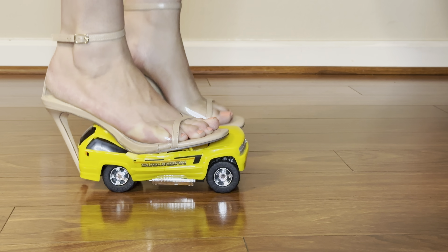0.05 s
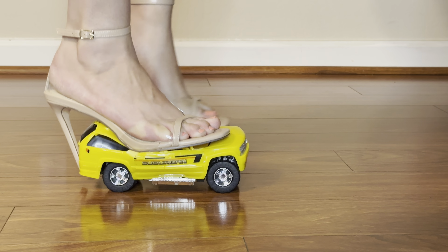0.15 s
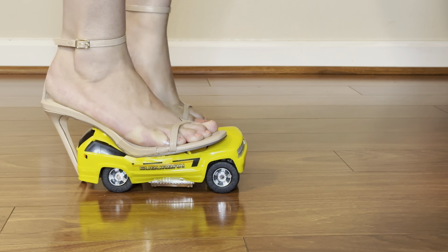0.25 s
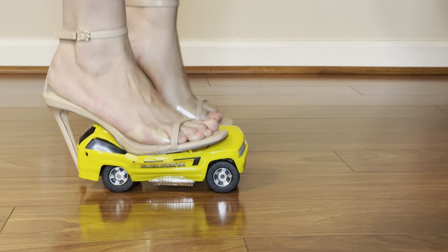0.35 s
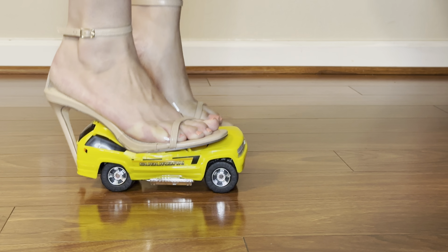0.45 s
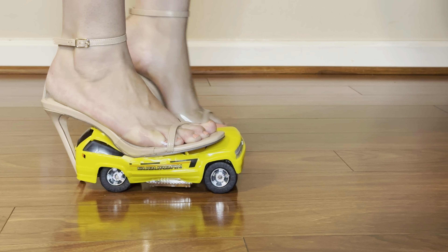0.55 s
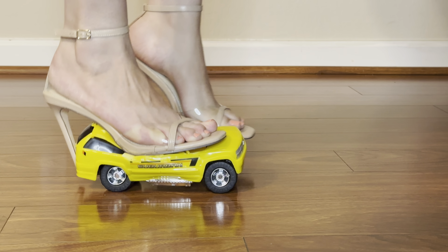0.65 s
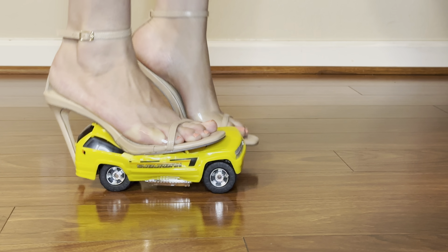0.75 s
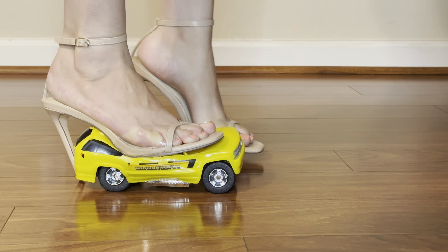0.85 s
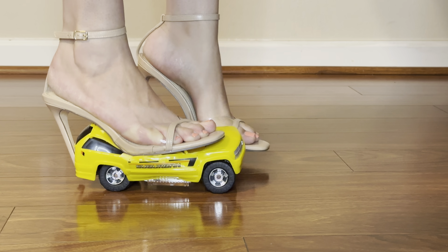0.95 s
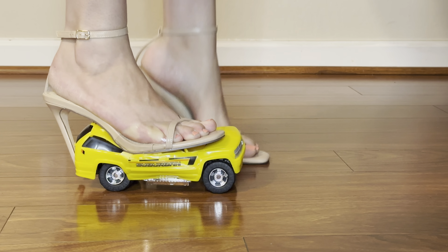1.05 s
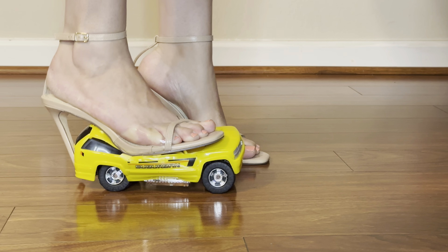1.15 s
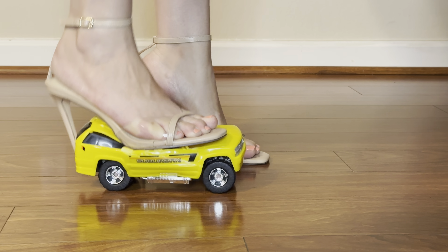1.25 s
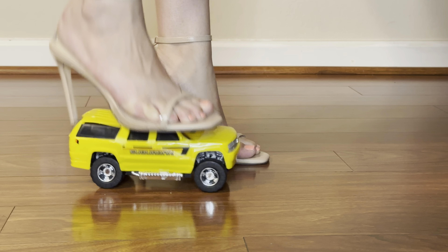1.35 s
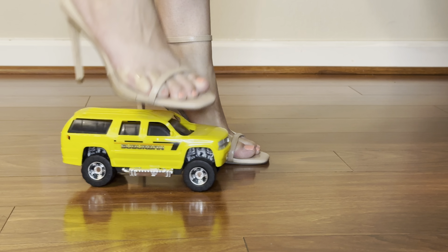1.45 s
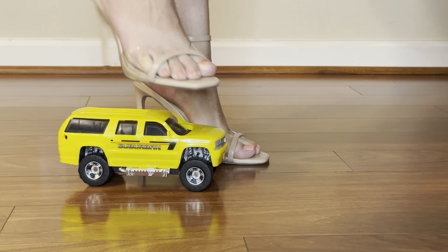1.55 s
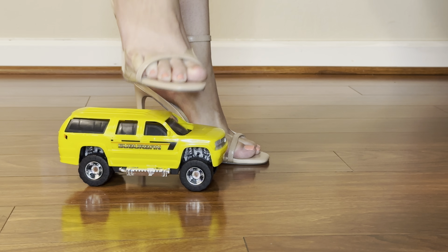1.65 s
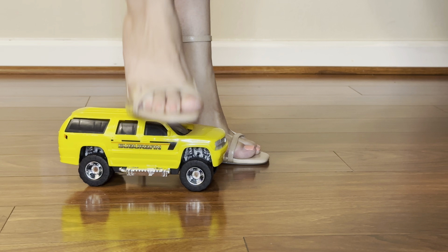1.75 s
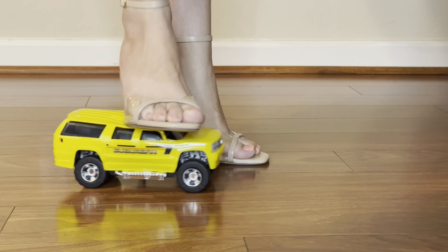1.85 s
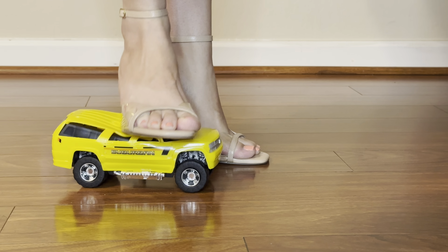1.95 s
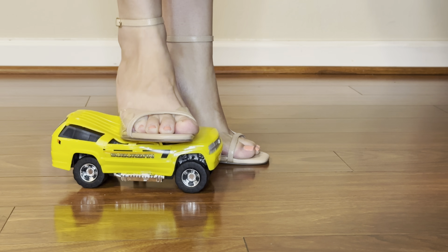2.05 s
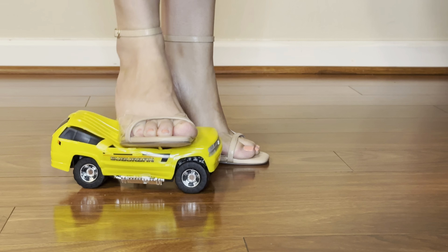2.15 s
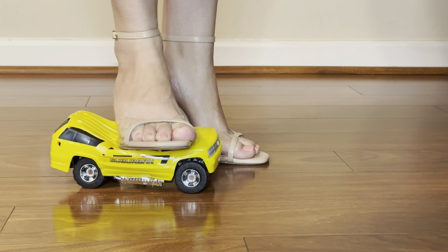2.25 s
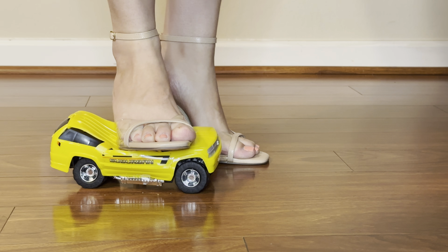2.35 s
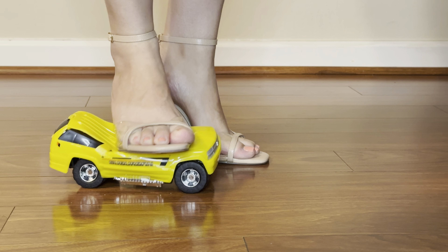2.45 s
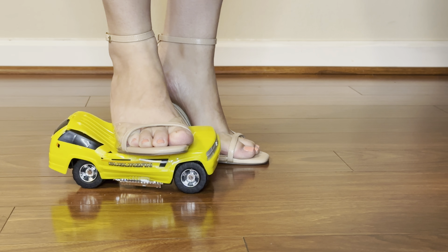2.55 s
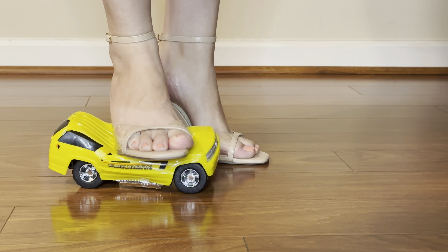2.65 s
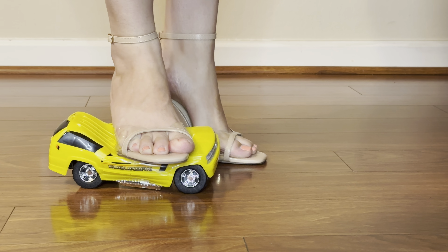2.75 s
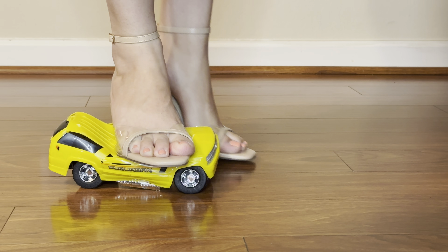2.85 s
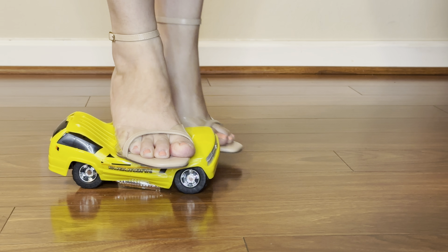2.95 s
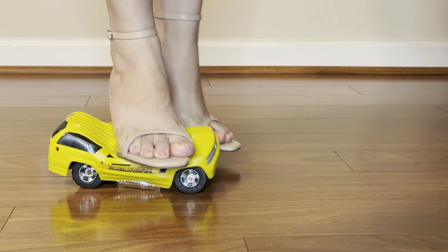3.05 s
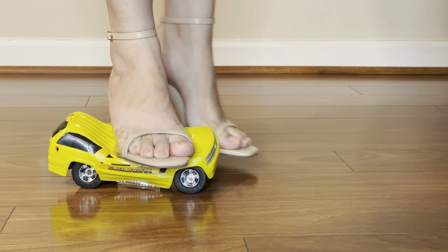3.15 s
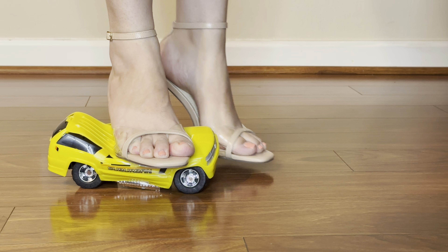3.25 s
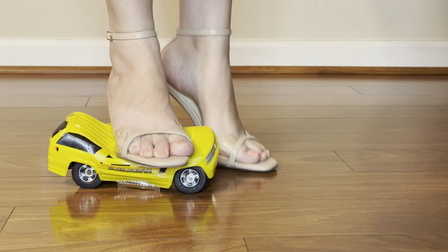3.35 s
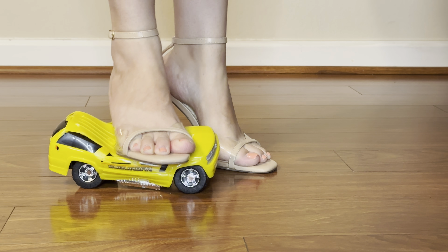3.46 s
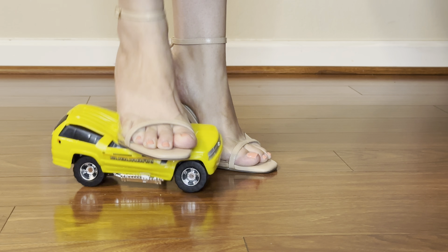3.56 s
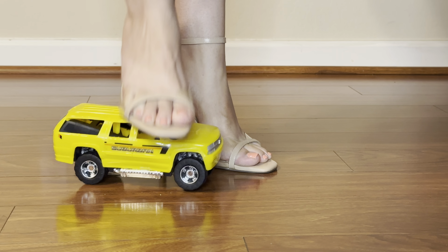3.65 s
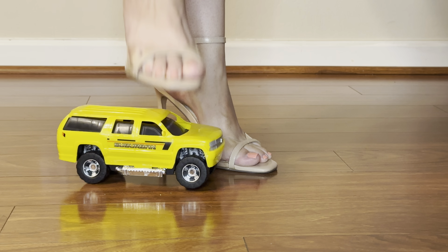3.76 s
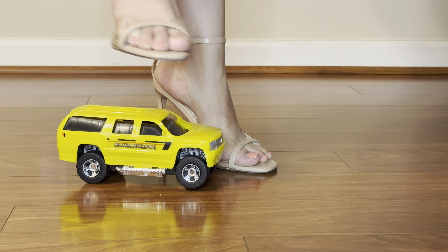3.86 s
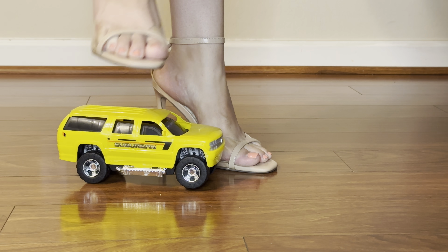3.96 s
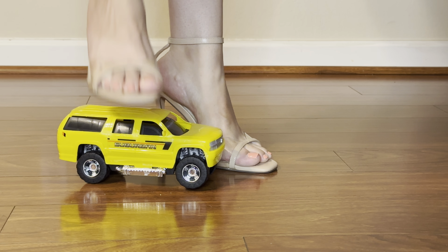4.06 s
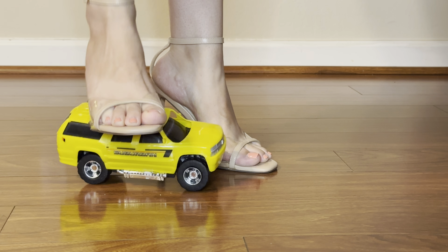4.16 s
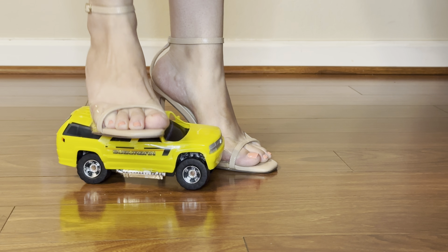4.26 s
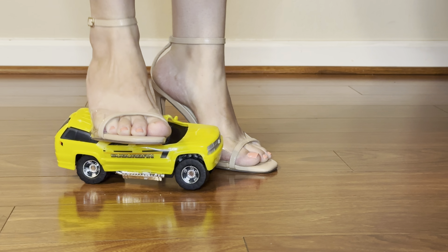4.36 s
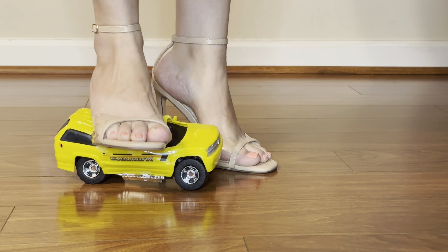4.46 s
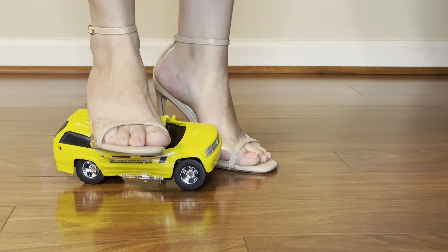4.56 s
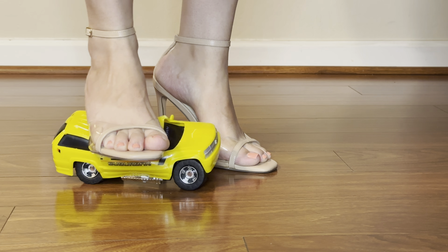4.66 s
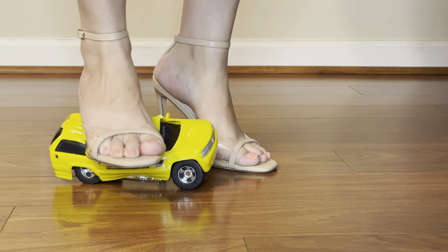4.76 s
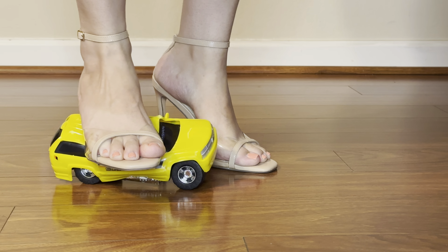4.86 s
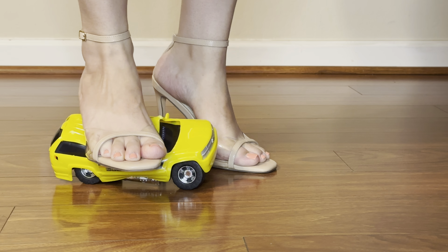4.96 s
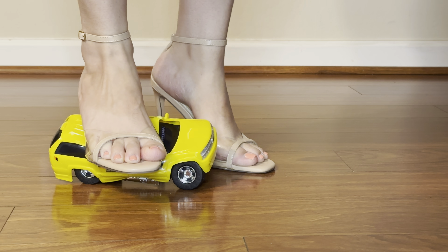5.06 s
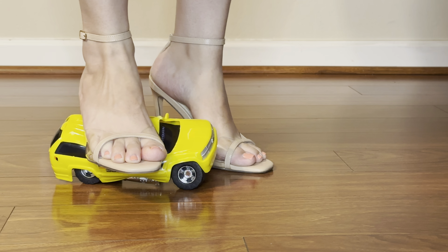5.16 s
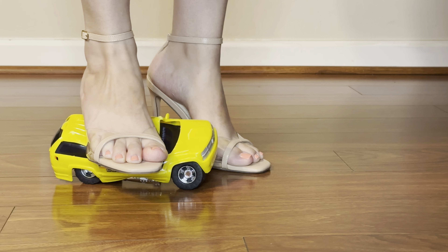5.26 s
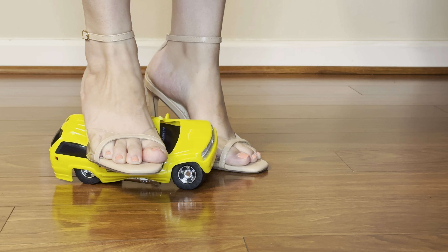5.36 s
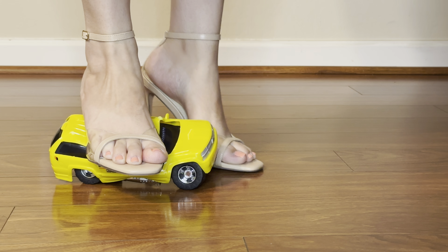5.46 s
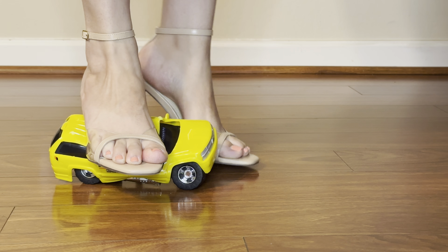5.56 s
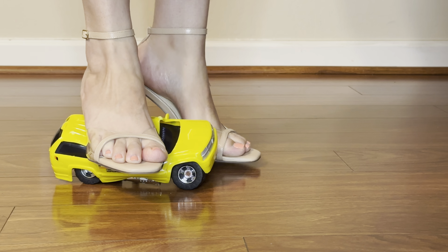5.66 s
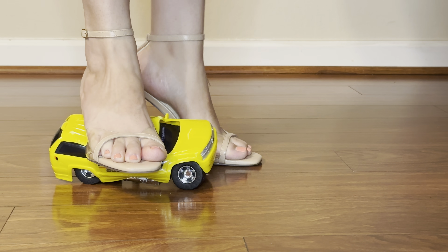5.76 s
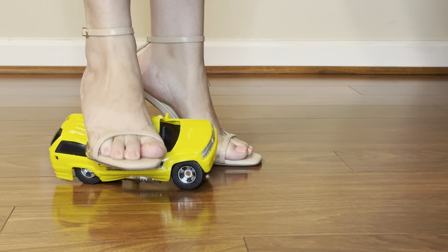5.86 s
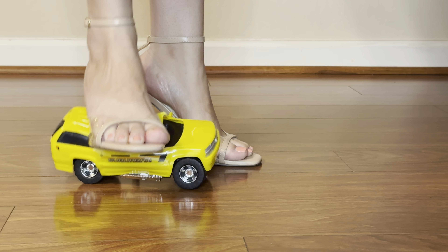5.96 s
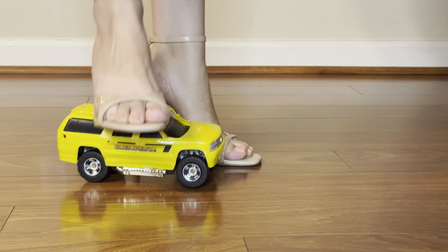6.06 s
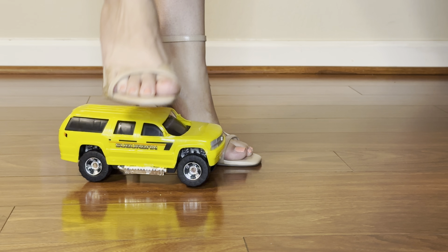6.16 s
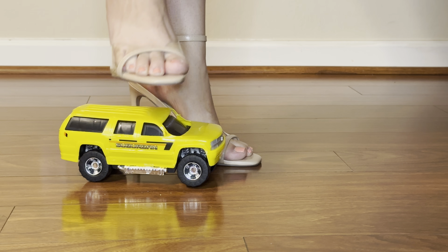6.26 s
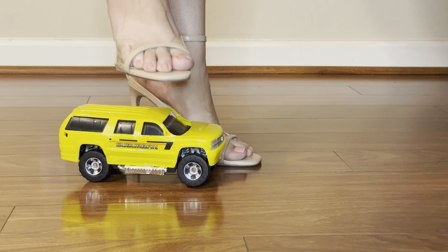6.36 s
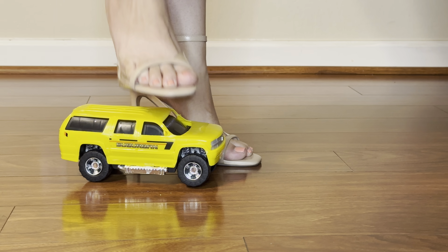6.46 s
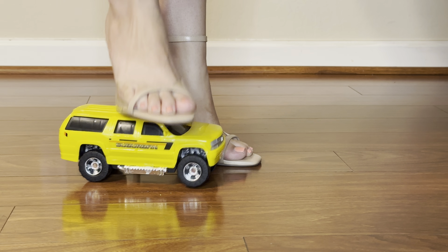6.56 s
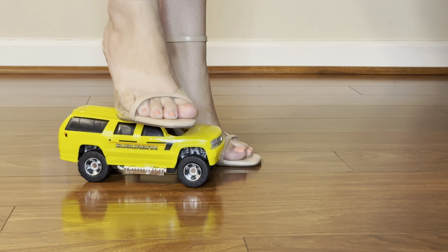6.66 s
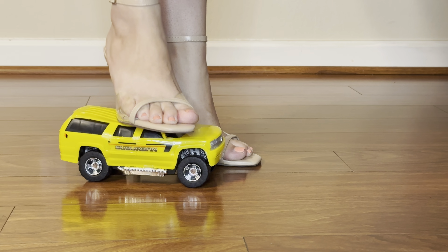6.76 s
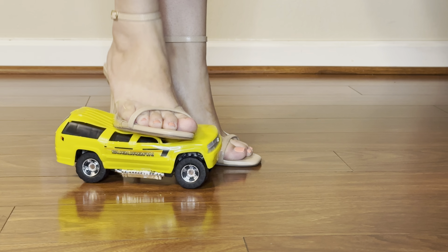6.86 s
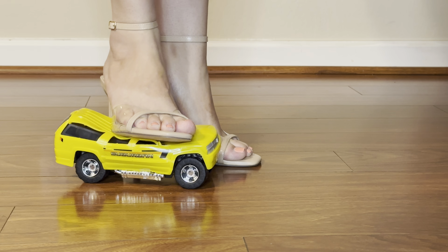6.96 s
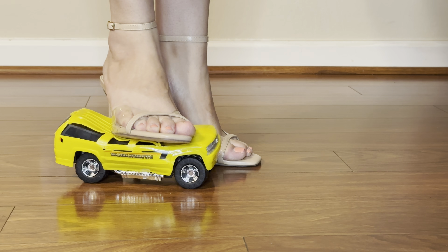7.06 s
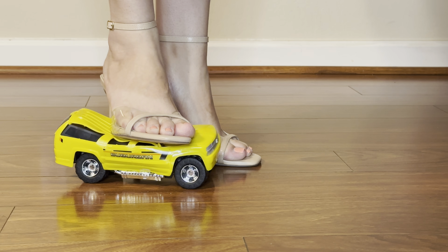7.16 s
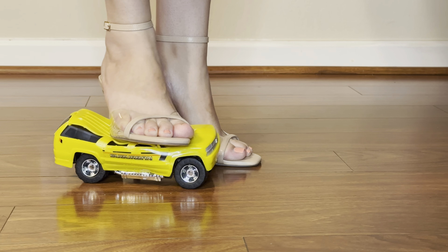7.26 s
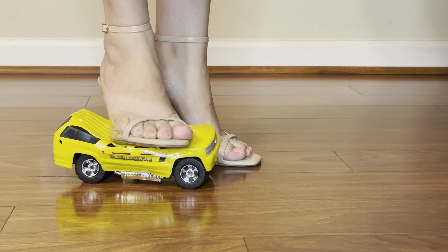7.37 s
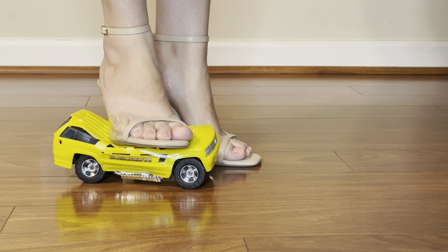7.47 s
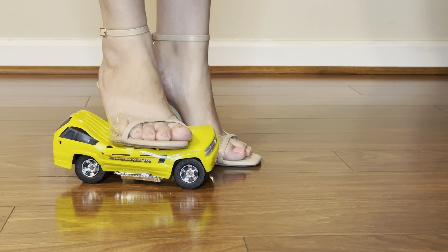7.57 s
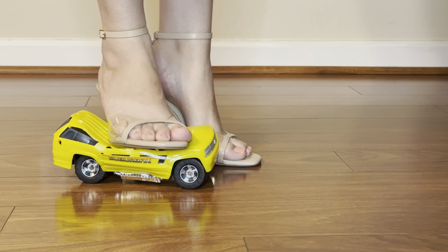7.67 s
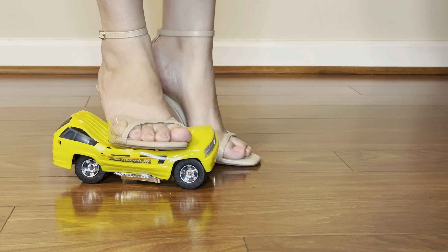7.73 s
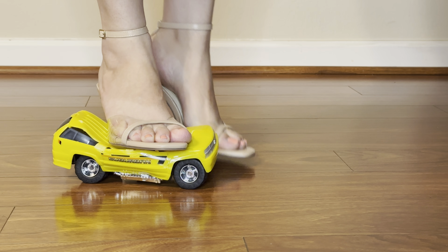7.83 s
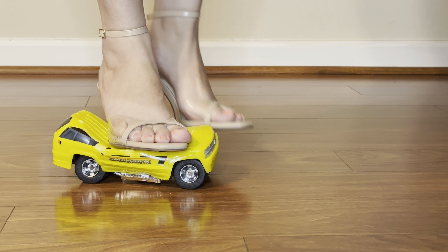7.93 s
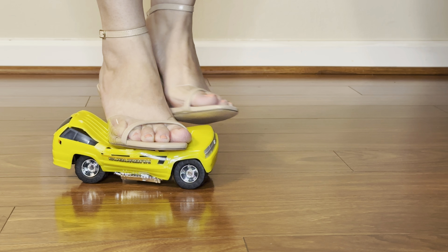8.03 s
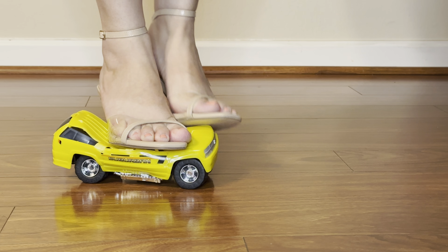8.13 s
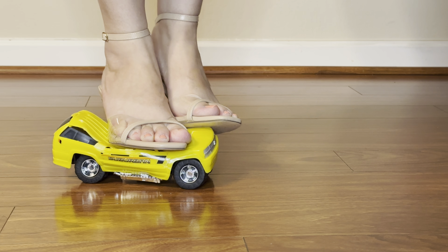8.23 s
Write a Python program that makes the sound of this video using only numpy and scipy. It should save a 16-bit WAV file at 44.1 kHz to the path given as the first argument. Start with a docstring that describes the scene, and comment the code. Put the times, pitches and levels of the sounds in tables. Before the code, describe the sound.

A quiet bare room with faint steady hiss, heard close from floor level in stereo. For the first second only soft plastic ticks and slight rumble. From 1.1 to 1.45 s a dense flurry of hollow snaps crackles as the shell springs free. At 1.8 to 2.5 s heavier clacks and crunches land, loudest near 2.1, with low wooden floor thuds. Near silence follows, with a very faint sole hiss about 3.1. Light knocks at 3.4 lead to rapid pops by 3.7. A hard hollow blow at 4.15 starts creaks and cracks until 4.75. A quiet pause, tiny ticks, then a tight burst of snaps at 6.05. Single knocks at 6.35 and 6.6 precede a very loud sharp crack at 6.86, more snaps at 7.1 and 7.3, a soft tick at 7.7, and small clicks around 8.1 to 8.2.

```python
"""In a quiet bare room with a sprung wooden floor, heeled sandals tread on a hollow plastic toy car.
The shell snaps and buckles: noise bursts shaped by panel resonances excite the room's decaying echo.
Each blow also rings damped floorboard modes; between blows the bent plastic ticks and the weight rumbles.
One soft hiss, perhaps a sole on the varnish, is filtered noise, as is the steady room tone.
A small camera with two sound ports listens from floor level."""
import sys
import numpy as np
from scipy import signal
from scipy.fft import rfft, irfft, next_fast_len
from scipy.io import wavfile
from scipy.ndimage import uniform_filter1d, map_coordinates

SR = 44100
rng = np.random.default_rng(int(sys.argv[2]) if len(sys.argv) > 2 else 0)


def master(y):
    """Save y as 16-bit WAV."""
    cut = np.clip(np.atleast_2d(y).T, -1, 1)
    pcm = np.round(cut * 32767)  # scale
    wavfile.write(sys.argv[1], SR, pcm.astype(np.int16))


N = 366030

# Still air and microphone hiss, relative spectrum: (frequency [Hz], level [dB per Hz])
AIR_SPECTRUM = [(15, -35.5), (35, -4.5), (100, -4), (460, -17.5), (950, -29.5), (1600, -24.5),
                (6500, -33.5), (9500, -29.5), (16000, -49.5)]
# Weight bending or leaving the shell: (start [s], end [s], crackle level [dB], rumble level [dB])
LOADS = [(0, 0.86, -62.5, -48), (1.11, 1.144, -46, -39), (1.33, 1.407, -40, -41.5),
         (1.82, 1.881, -42, -40.5), (2.0, 2.167, -37.5, -33.5), (2.3, 2.47, -53.5, -48.5),
         (2.7, 2.955, -73.5, -71), (3.58, 3.63, -46, -47.5), (3.72, 3.725, -35, -42),
         (4.18, 4.365, -44, -38.5), (4.67, 4.755, -51.5, -48), (5.8, 5.993, -62.5, -53.5),
         (6.06, 6.079, -35, -35.5), (6.63, 6.652, -47.5, -43), (6.87, 6.924, -32, -37),
         (7.13, 7.315, -52.5, -49.5), (8.217, 8.294, -58.5, -53)]
# Relative spectrum of the crackle: (frequency [Hz], level [dB per Hz])
CRACKLE_SPECTRUM = [(120, -31), (220, 1), (500, -11), (1400, -4.5), (3000, -17), (7000, -27.5),
                    (10000, -30.5), (16000, -49)]
# Resonances of the plastic shell: (frequency [Hz], width [Hz], relative level [dB])
SHELL_MODES = [(327, 110, -1), (755, 290, -8), (1059.5, 21, 0.5), (1210, 23, -3.5), (1395, 15, -1.5),
               (1760, 67, -13.5), (2300, 450, -17), (3050, 480, -12), (6300, 110, -42.5)]
# Modes of the floorboards: (frequency [Hz], relative level [dB], decay by 60 dB [s])
BOARD_MODES = [(57, -11.5, 0.64), (73.6, 1.5, 0.31), (92.46, 4, 0.41), (115.4, -3, 0.38),
               (138.5, -0.5, 0.28), (172.4, -12, 0.2), (211, -8, 0.28)]
# Reverberation of the room: (frequency [Hz], decay by 60 dB [s])
ROOM_DECAY = [(200, 0.29), (1000, 0.45), (3000, 0.41), (6500, 0.44), (12000, 0.29)]
# Snaps and knocks of the shell, levels relative: (time [s], snap level [dB], panel frequency [Hz],
# rib frequency [Hz], panel and rib level [dB], hollow body level [dB], edge level [dB],
# treble level [dB], floor boom level [dB])
SNAPS = [(0.0299, -36, 950, 2630, -14, 1, -18, -23, -45), (0.1256, -38, 960, 2230, -3, 2, -16, -52, -46),
         (0.2031, -43, 1020, 2240, -5, -5, -12, -28, -47),
         (0.2273, -35, 1350, 2140, -5, 4.5, -7, -13.5, -40),
         (0.2624, -40.5, 730, 2230, -3, -4, -18, -16, -38.5),
         (0.4233, -40.5, 980, 2080, 7, 6, -2, -27, -47.5),
         (0.5154, -42, 1260, 2540, -11, -5, -8, -15, -39.5),
         (0.5395, -40, 1030, 2030, -9, 1, -18, -18, -36),
         (0.7808, -43, 1040, 1900, -14, 0.5, -9.5, -20, -40.5),
         (0.816, -41, 1050, 2050, 3, -19, -13, -22, -42.5), (0.8926, -58.5, 1050, 3160, 1, -23, 4, -1, -49),
         (0.9685, -52, 1280, 2107, 13, -9, -3, -18, -62.5), (1.0798, -27, 567, 2670, -9, 1, -7, -9, -40),
         (1.1036, -19.5, 710, 1920, 1.5, 13, -1.5, -7, -28),
         (1.2388, -37, 977, 2170, 18, 10, -8, -11.5, -39),
         (1.266, -18.5, 675, 2180, -1.5, -7.5, -9, -17, -38.5),
         (1.2975, -22, 1180, 2260, -11, -1, -12, -18, -30),
         (1.308, -25, 1110, 2250, 5.5, -5, -5.5, -22, -35),
         (1.324, -18, 1032, 1800, 5, -18, -22, -29.5, -32.5),
         (1.3271, -13.5, 1230, 2300, -4.5, -10, -11, -25, -30),
         (1.337, -16, 1417, 1890, -5.5, -15, -30, -24, -29),
         (1.3434, -19.5, 1290, 2300, 1, -12.5, -21, -35, -43),
         (1.3622, -14, 664, 2620, -2, 4, -8, -6.5, -27),
         (1.3878, -18, 1154, 2960, -6, 1, -2.5, -7.5, -31.5),
         (1.4201, -21.5, 730, 2980, -3.5, -9.5, -13, -19.5, -34.5),
         (1.4289, -24.5, 1103, 2960, -1, -4, -1.5, -20, -30.5),
         (1.45, -36, 1100, 2800, 12, -13.5, -0.5, -22, -46),
         (1.7913, -20.5, 1020, 1790, -6, -2, -15.5, -14, -25.5),
         (1.8247, -19, 1085, 2900, 6.5, 2.5, -10.5, -16.5, -29.5),
         (1.8597, -28, 1043, 1870, -2.5, -10, -13, -19, -35.5),
         (1.9751, -20.5, 1341, 1870, -4.5, -4.5, -13.5, -23, -24.5),
         (1.9977, -21.5, 1035, 1850, -1.5, 8, -12.5, -22, -22.5),
         (2.0133, -13, 717, 2780, -0.5, -14.5, -20, -26.5, -25.5),
         (2.0987, -5.5, 1057, 3280, -2.5, -1, -10, -17, -22),
         (2.129, -12, 1029, 1830, -6, -5, -8, -7.5, -18),
         (2.2894, -14, 1187, 2720, 0.5, -4.5, -19, -24.5, -35.5),
         (2.4376, -10, 1008, 2970, -5, 4.5, -2, -6, -24), (2.4815, -17, 637, 1680, 1, 3.5, -9, -27, -21.5),
         (3.0046, -37.5, 1234, 1940, 1, -7, -28.5, -32.5, -63),
         (3.2076, -61.5, 755, 3920, 3.5, 13, -15, -13, -62),
         (3.2887, -58, 670, 2250, -4, 15, -4, -21.5, -56),
         (3.3937, -30, 545, 3160, -2, 10.5, 1, -3.5, -43.5), (3.4436, -26, 630, 1820, -9, 8, -15, -17, -31),
         (3.5335, -23, 1320, 2150, 1.5, -2, -1.5, -15.5, -37),
         (3.5493, -30.5, 1205, 2020, 5, -1, -24, -27, -39.5),
         (3.5823, -17, 652, 2930, 16.5, -11.5, -29, -22, -36.5),
         (3.5961, -31, 727, 2428, 6.5, -19, 2, -18, -41.5),
         (3.6873, -19, 984, 1910, -2.5, -5, -16, -11, -44),
         (3.693, -14, 1080, 2940, 6, -17, -14, -15.5, -33.5),
         (3.7074, -10, 1360, 2980, 2.5, 6.5, -1, -8.5, -28),
         (4.1353, -26.5, 499, 2490, 4, -5, -3.5, -6, -39.5),
         (4.146, -8, 620, 2980, 1, 1.5, -8.5, -8.5, -26.5),
         (4.2155, -24.5, 1410, 3100, 0, 0, -11, -12, -32.5),
         (4.2762, -34.5, 1240, 3000, 1.5, -7.5, -19, -8, -30.5),
         (4.3265, -16, 1587, 1810, -3.5, -4, -10.5, -22, -33.5),
         (4.3409, -17, 740, 1920, 5, -0.5, -15, -19, -29.5),
         (4.3606, -19, 1045, 2120, 5.5, -10, -3.5, -15.5, -39),
         (4.4549, -17.5, 737, 2200, 15, -5.5, -10, -30.5, -61),
         (4.6469, -15.5, 1290, 2060, 7.5, -0.5, -8.5, -19.5, -28.5),
         (4.74, -15, 1480, 4440, -10, -14.5, -1, -7, -47.5),
         (5.0545, -62.5, 1250, 2200, 4, -9.5, 6.5, -2.5, -75),
         (5.104, -68, 1490, 3086, 0.5, -8, -11, 6, -80.5),
         (5.4051, -51.5, 572, 4630, -2, 15, -26, -17, -63.5),
         (5.7623, -37, 581, 2050, -8.5, 11.5, -12, -21, -37.5),
         (5.7952, -31.5, 604, 2000, 4, 5.5, -18, -30.5, -37),
         (5.8609, -51.5, 610, 2110, -6, 5, -6, -7, -53.5),
         (5.9488, -49, 649, 1740, -7.5, -1, -9.5, -28, -45.5),
         (6.017, -36, 1320, 2420, 1.5, -2, -0.5, -11, -34.5),
         (6.0299, -12.5, 660, 3160, 6, -8.5, -16.5, -29, -31.5),
         (6.044, -9, 635, 1850, 2, -1.5, -14.5, -7, -23.5),
         (6.0609, -11, 1157, 2350, 3, 1, -9.5, -34, -26.5),
         (6.0755, -17, 1220, 2260, -12, -6, -6.5, -18.5, -30),
         (6.0836, -12.5, 1170, 1920, 2, 0.5, -2, -9, -28.5),
         (6.355, -24.5, 1180, 2770, -3, 1, -7.5, -18.5, -39.5),
         (6.611, -22, 559, 1940, -1, -4, -14, -11, -30.5),
         (6.797, -23.5, 1023, 2360, -2, -13, -19.5, -54, -51.5),
         (6.843, -17.5, 830, 1800, 3.5, 8, -7, -18, -23.5),
         (6.8582, -4.5, 1364, 3040, 8.5, 4, -3, -16, -25.5),
         (6.929, -19.5, 1420, 2500, 2.5, -7, -6, -20, -29.5),
         (7.1099, -13.5, 704, 1780, 0.5, 0, -0.5, -4.5, -29.5),
         (7.3009, -25.5, 1450, 2500, 2, 8.5, -8, -11.5, -48),
         (7.7147, -39, 720, 1830, -9.5, 4.5, -18, -25, -40.5),
         (8.0974, -50.5, 586, 1980, 4.5, 12.5, -11, -21.5, -57),
         (8.113, -43, 1470, 2160, 0, -0.5, -7.5, -19, -50),
         (8.165, -46.5, 1400, 2020, -6, -4, -12.5, -31, -56),
         (8.1835, -27.5, 1320, 1900, -2, 1.5, 0.5, -17, -42)]
# Level of a sole brushing the boards: (time [s], level [dB])
SCUFF_LEVEL = [(2.97, -79), (3.118, -62.5), (3.144, -66), (3.25, -91)]
# Resonances of the brushing sole: (frequency [Hz], width [Hz], relative level [dB])
SOLE_MODES = [(3660, 450, 0), (7460, 680, -3), (8906, 740, -3)]
# Gain of the unrelated sound at the two ports: (frequency [Hz], level [dB])
PORT_DIFFERENCE = [(60, -43.5), (150, -14), (600, -4), (1100, -3.5), (1500, -9.5), (2000, -27.5),
                   (4000, -18), (5700, -31), (9000, -12.5), (16000, -18.5)]
# Phase turned by the camera body, ahead at the left port and back at the right: (frequency [Hz], phase [rad])
PORT_LEAD = [(1900, -.04), (2400, .11), (2950, .27), (4100, .34), (4850, .22), (5700, .02), (6500, .12),
             (7250, .62), (7750, 1.25), (8000, 1.5), (8500, 1.54), (8950, 1.08), (9650, .63), (10700, .28),
             (12000, 0), (13800, -.45), (15200, -.9)]

AIR_DB = -74
LOAD_RISE_DB_PER_S, LOAD_FALL_DB_PER_S = 900, 121
SLIPS_PER_S, SLIP_SPREAD_DB, SLIP_T60_S = 400, 5, .012
CLUMP_DB, CLUMPS_PER_S = 2.5, 27  # slips come in bunches
AFTER_DB, AFTER_RISE_S, AFTER_T60_S = -9.5, .03, .42  # uneven rumble left in the boards by each boom
BURST_T60_S = 0.033
PANEL_WIDTH, RIB_WIDTH = .15, .09  # fractions of their frequency
PANEL_DB, RIB_DB = 2.5, -4  # added to each snap's own panel and rib level
ROOM_DB = -6  # echo energy relative to the direct snap
AXLE_HZ, AXLE_DB, AXLE_T60_S = 2215, -53, 1.1  # a thin metal part, perhaps an axle; level relative to the snap
BOOM_HZ, BOOM_OCT_PER_DB, BOOM_SCATTER_OCT = 97.6, 0.11, .15  # hollower knocks favour the higher boards
CEILING = .98  # amplitude that rounded peaks approach
TOP_HZ = 16800


def amp(db):
    """Definition of the decibel: level to amplitude ratio."""
    return 10 ** (np.asarray(db) / 20)


def unit(x):
    """Normalisation to an effective (root mean square) value of 1."""
    return x / np.sqrt(np.mean(x ** 2, axis=-1, keepdims=True) + 1e-20)


def along(points, hz):
    """Interpolation of (frequency, value) points on a logarithmic frequency axis."""
    f, v = np.transpose(points)
    return np.interp(np.log(hz + 1), np.log(f + 1), v)


def filtered(x, response):
    """Linear filtering: the spectrum is multiplied by a complex frequency response."""
    m = next_fast_len(x.shape[-1] + 4096)
    spectrum = rfft(x, m) * response(np.fft.rfftfreq(m, 1 / SR))
    return irfft(spectrum, m)[..., :x.shape[-1]]


def causal(gain):
    """Minimum phase: folding the cepstrum gives this gain without ringing ahead."""
    cepstrum = irfft(np.log(gain + 1e-6))
    half = cepstrum.shape[-1] // 2
    cepstrum[..., 1:half] *= 2
    cepstrum[..., half + 1:] = 0
    return np.exp(rfft(cepstrum))


def peaks(modes, hz):
    """Superposition of resonances: the powers of (frequency, width, level) modes add."""
    return np.sqrt(sum(amp(db) ** 2 / (1 + (2 * (hz - c) / w) ** 2) for c, w, db in modes))


def echo(seconds, colour):
    """Diffuse reverberation: a pair of noise tails of energy 1, each frequency decaying at its own rate."""
    noise = rng.standard_normal((2, round(seconds * SR)))
    hz, t, z = signal.stft(noise, SR, nperseg=512)
    decay = amp(-60 * t / along(ROOM_DECAY, hz)[:, None])
    tail = signal.istft(z * colour(hz)[:, None] * decay, SR, nperseg=512)[1]
    tail = tail * (1 - np.exp(-np.arange(tail.shape[1]) / SR / 0.0013))  # the echoes build up
    return unit(tail) / np.sqrt(tail.shape[1])


def in_room(x, wet_db):
    """Direct and diffuse field: a shared part with echo, and an unrelated part that is all echo."""
    tail = amp(wet_db) * echo(.5, np.ones_like)
    tail[:, 0] = 1, 0  # the direct sound is in the shared part only
    return signal.fftconvolve(x[None], tail, axes=1)[:, :len(x)]


def room_tone():
    """Stationary noise: the still room and the microphone's own hiss."""
    noise = rng.standard_normal((2, N))
    return amp(AIR_DB) * unit(filtered(noise, lambda hz: amp(along(AIR_SPECTRUM, hz))))


def load_levels(t):
    """Loading and release: crackle and rumble levels rise and fall linearly in dB around each spell."""
    spells = []
    for start, end, *db in LOADS:
        rise = LOAD_RISE_DB_PER_S * np.clip(start - t, 0, None)
        fall = LOAD_FALL_DB_PER_S * np.clip(t - end, 0, None)
        spells.append(np.array(db)[:, None] - rise - fall)
    return np.max(spells, axis=0)


def slip_ticks(t):
    """Stick-slip: bent plastic yields in small, uneven, bunched scrapes coloured by the shell."""
    size_db = SLIP_SPREAD_DB * np.minimum(rng.exponential(size=N), 3)
    slips = (rng.random(N) < SLIPS_PER_S / SR) * amp(size_db)
    clumps = rng.standard_normal(round(N / SR * CLUMPS_PER_S) + 4)
    slips = slips * amp(CLUMP_DB * map_coordinates(clumps, [t * CLUMPS_PER_S]))
    decay = amp(-60 * t[:1024] / SLIP_T60_S)
    scrapes = signal.fftconvolve(slips, decay)[:N] * rng.standard_normal(N)
    colour = lambda hz: amp(along(CRACKLE_SPECTRUM, hz)) * peaks(SHELL_MODES, hz) ** 0.16
    return unit(filtered(scrapes, lambda hz: causal(colour(hz))))


def board_rumble():
    """Random excitation: noise filtered by broadened floorboard resonances."""
    boards = [(hz, 2.2 / t60 * 3, db) for hz, db, t60 in BOARD_MODES]  # three times their decay bandwidth
    return unit(filtered(rng.standard_normal((2, N)), lambda hz: peaks(boards, hz) ** 1.7))


def strain():
    """Stick-slip and forced vibration: loaded plastic ticks, weight rumbles, boards rumble on after booms."""
    t = np.arange(N) / SR
    crackle_db, weight_db = load_levels(t)
    power = amp(weight_db) ** 2
    for s, *_, boom_db in SNAPS:
        since = np.clip(t - s, 0, None)
        after = amp(boom_db + AFTER_DB - 60 * since / AFTER_T60_S)
        power = power + (after * (1 - np.exp(-since / AFTER_RISE_S))) ** 2
    crackle = in_room(amp(crackle_db) * slip_ticks(t), wet_db=-5)
    return crackle + np.sqrt(power) * board_rumble()


def burst(colour, t60):
    """Transient release: two dying, lumpy noise bursts, their chance colour partly replaced by the given one."""
    t = np.arange(4096) / SR
    release = rng.standard_normal((2, len(t))) * amp(-60 * t / t60)
    release *= (1 - np.exp(-t / 0.00063)) * (1 + 0.79 * np.exp(-t / 0.0005))  # onset
    release *= amp(3 * rng.standard_normal(len(t) // 32)).repeat(32)  # lumps
    z, hz = rfft(release, 2 * len(t)), np.fft.rfftfreq(2 * len(t), 1 / SR)
    chance = np.sqrt(uniform_filter1d(np.abs(z) ** 2, size=41))
    crack = irfft(z * causal(colour(hz) / chance ** 0.5))[:, :len(t)]
    return crack / np.linalg.norm(crack, axis=1, keepdims=True) * 5.57  # a peak near 1


def shell_crack(t, db, panel_hz, rib_hz, ring_db, body_db, edge_db, treble_db):
    """Impulsive excitation of resonators: a release rings panels, ribs and a thin metal part, and fills the room."""
    panels = [(c, w, g + rng.normal(0, 1.5)) for c, w, g in SHELL_MODES]
    panels += [(panel_hz, PANEL_WIDTH * panel_hz, PANEL_DB + ring_db),
               (rib_hz, RIB_WIDTH * rib_hz, RIB_DB + ring_db)]
    tilt = [(40, body_db - 31.5), (150, body_db - 6), (450, body_db), (1350, 0),
            (3200, edge_db + 6), (7000, treble_db + 18.5), (16000, treble_db + 9.5)]  # (Hz, dB)
    colour = lambda hz: peaks(panels, hz) ** 0.92 * amp(along(tilt, hz))
    # heard from all sides the panels' peaks even out
    spread = lambda hz: colour(hz) / peaks(panels, hz) ** 0.09
    crack = amp(db + 4.0) * burst(colour, BURST_T60_S)
    sound = amp(ROOM_DB) * np.linalg.norm(crack[0]) * echo(.55, spread)[:, :len(t)]
    sound[:, :crack.shape[1]] += crack * [[1], [.6]]
    axle = amp(db + AXLE_DB + rng.normal(0, 3) - 60 * t / AXLE_T60_S) * np.sin(2 * np.pi * AXLE_HZ * t)
    sound[0] += axle * np.cos(t / t[-1] * np.pi / 2)  # faded to nothing at the end
    return sound


def floor_boom(t, body_db, boom_db):
    """Modal excitation: a blow starts damped floorboard modes at strengths set by where it lands."""
    board_hz, board_db, board_t60 = np.transpose(BOARD_MODES)
    swell = (1 - np.exp(-t / 0.0054)) ** 2  # the heavy boards take time to get going
    ringing = swell * amp(-60 * t / board_t60[:, None]) * np.exp(2j * np.pi * board_hz[:, None] * t)
    octaves = np.log2(board_hz / BOOM_HZ) - BOOM_OCT_PER_DB * body_db
    octaves -= BOOM_SCATTER_OCT * rng.standard_normal()
    near_db = -9 * np.abs(octaves)  # boards far from the favoured pitch are weaker
    strength = amp(board_db + near_db + 2 * rng.standard_normal(len(BOARD_MODES)))
    phase = np.exp(2j * np.pi * rng.random((2, len(BOARD_MODES))))
    boom = ((strength * phase) @ ringing).real
    return amp(boom_db + 3.0) * boom / np.abs(boom[0]).max()


def snaps():
    """Superposition: every snap of the shell is added to its boom in the boards."""
    out, t = np.zeros((2, N + SR)), np.arange(round(.55 * SR)) / SR
    for s, db, panel_hz, rib_hz, ring_db, body_db, edge_db, treble_db, boom_db in SNAPS:
        sound = shell_crack(t, db, panel_hz, rib_hz, ring_db, body_db, edge_db, treble_db)
        sound += floor_boom(t, body_db, boom_db)
        out[:, round(s * SR):][:, :len(t)] += sound
    return out[:, :N]


def scuff():
    """Friction noise: a soft uneven hiss through resonances, perhaps a sole brushing the varnish."""
    hiss = unit(filtered(rng.standard_normal((2, N)), lambda hz: peaks(SOLE_MODES, hz) ** 1.3))
    s, db = np.transpose([(2.95, -120), *SCUFF_LEVEL, (3.3, -120)])
    return amp(np.interp(np.arange(N) / SR, s, db)) * hiss


def scene():
    """Sum and difference: a shared and an unrelated part of all sources, combined at the two ports."""
    shared, apart = room_tone() + strain() + snaps() + scuff()
    apart = filtered(apart, lambda hz: amp(along(PORT_DIFFERENCE, hz)))
    turn = lambda hz: np.exp(1j * np.outer([1, -1], along(PORT_LEAD, hz)))
    ports = filtered(shared, turn) + [[1], [-1]] * apart
    return ports * amp([[.15], [-.15]])  # the left port is slightly louder


def record(dry):
    """Saturation and band limit: the loudest peaks are rounded off and the extreme treble fades, then stops."""
    rounded = dry / (1 + np.abs(dry / CEILING) ** 4) ** (1 / 4)
    return filtered(rounded, lambda hz: amp(along([(15500, 0), (16200, -16)], hz)) * (hz < TOP_HZ))


dry = scene()
out = record(dry)
master(out)
```